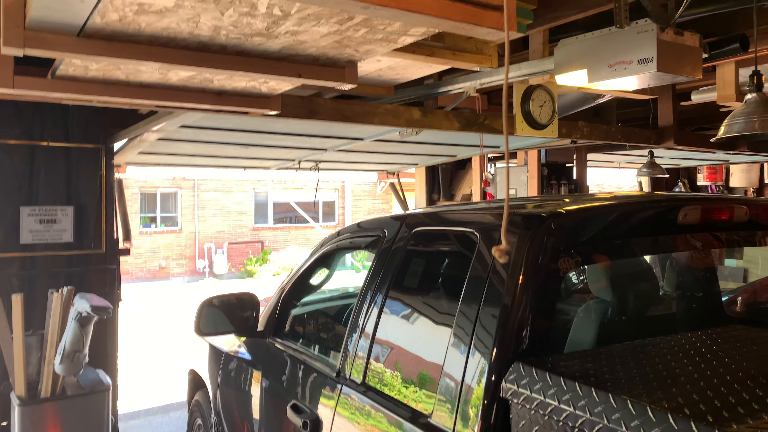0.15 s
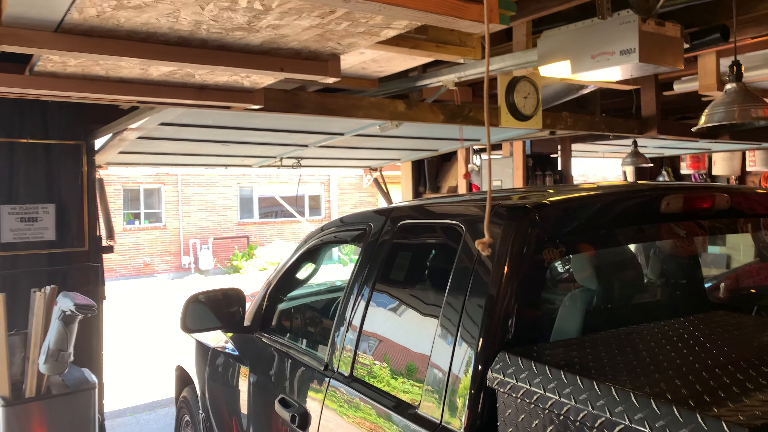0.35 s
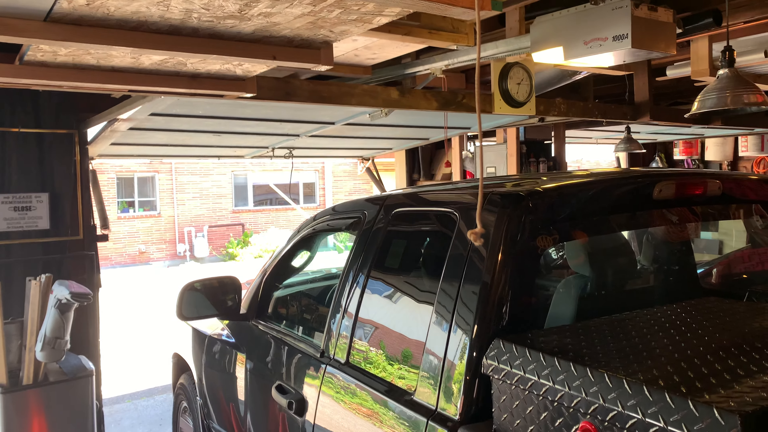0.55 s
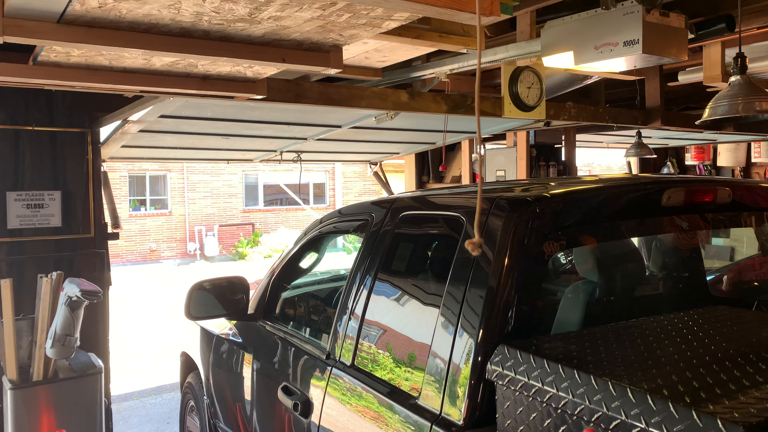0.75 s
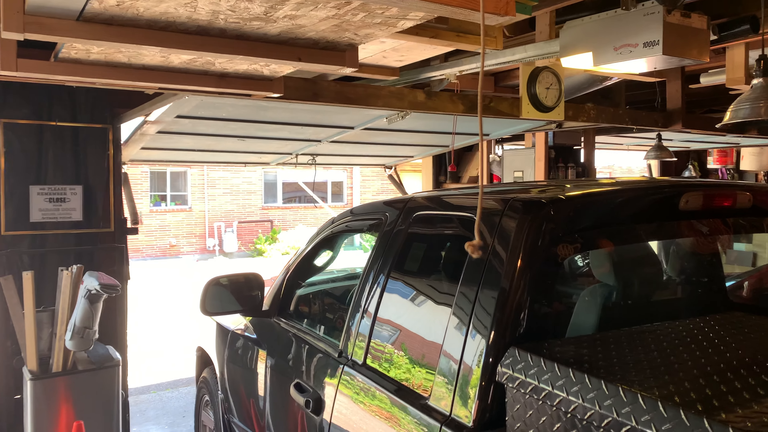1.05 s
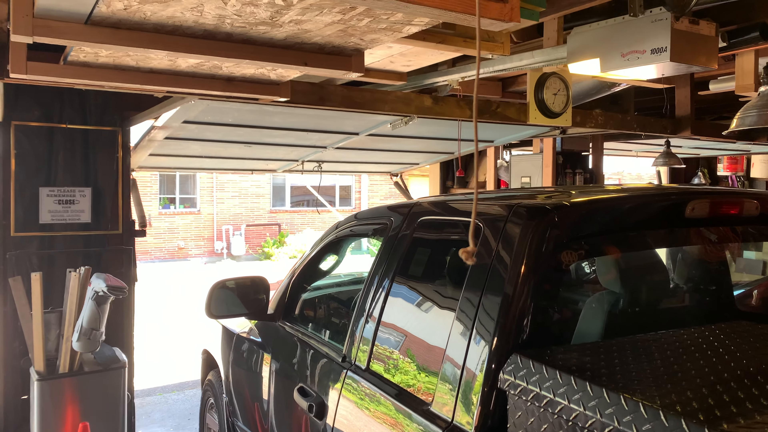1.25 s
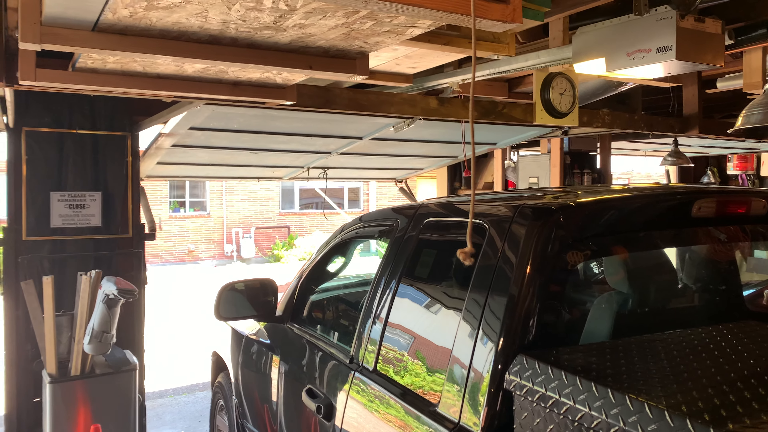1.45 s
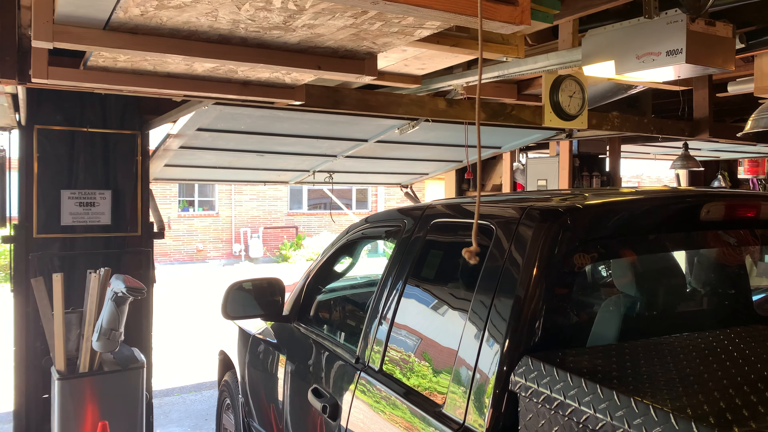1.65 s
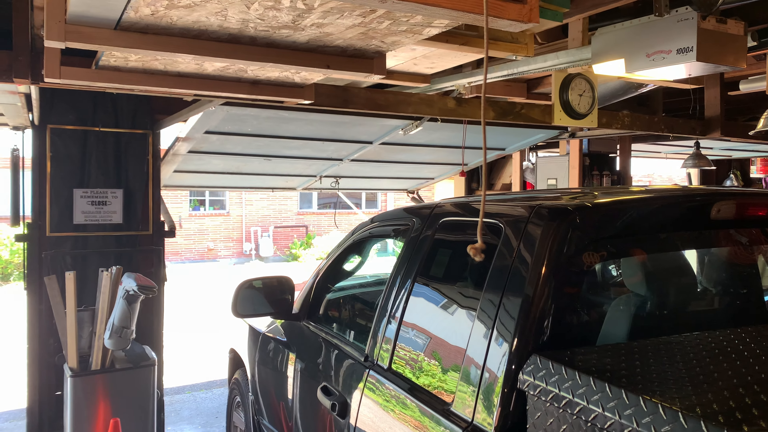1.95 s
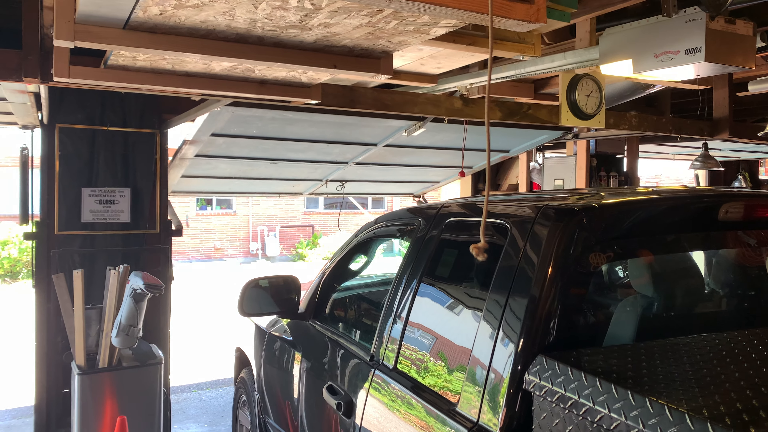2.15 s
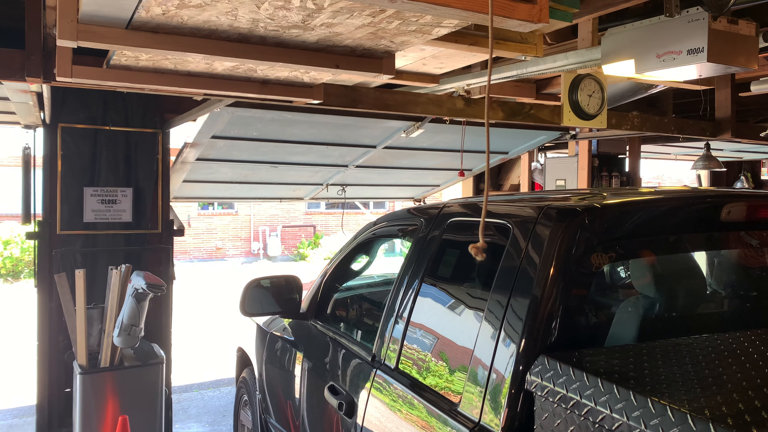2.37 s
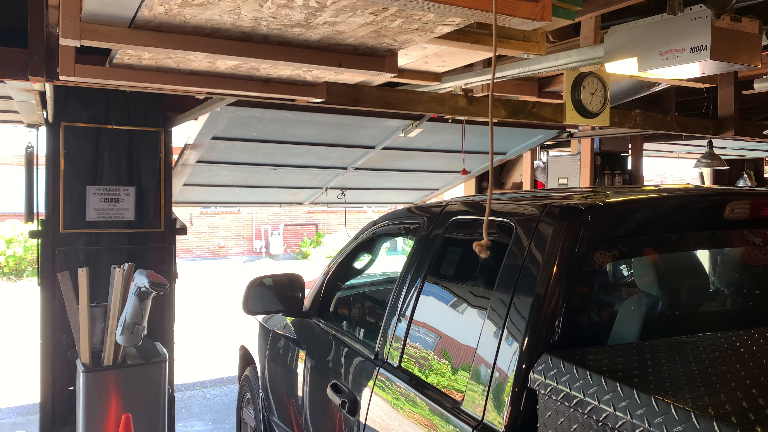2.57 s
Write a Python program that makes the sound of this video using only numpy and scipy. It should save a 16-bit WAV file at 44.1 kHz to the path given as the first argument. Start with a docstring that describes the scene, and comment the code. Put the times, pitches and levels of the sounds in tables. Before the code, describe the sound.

Garage door closing on a chain-drive opener, motor hum, ticking chain, opening clunk and rumbling rollers

```python
"""Chain-drive garage door closing

An opener lowers a sectional door in a cluttered wooden garage. The motor, sine tones at multiples
of twice the mains rate, hums; bursts of contacts tick as chain links seat on the sprocket.
The chain swishes along the rail, rollers rumble through resonant panels and squeak now and then,
loose panels rattle, and a panel joint clunks at the start with a decaying ring of steel."""
import sys
import numpy as np
from scipy import signal
from scipy.fft import rfft, irfft, next_fast_len
from scipy.io import wavfile

SR = 44100
rng = np.random.default_rng(int(sys.argv[2]) if len(sys.argv) > 2 else 0)


def wav_out(sig):
    """Save sig, one row per channel (or a flat mono array), as 16-bit PCM at SR to the path in sys.argv[1]."""
    wavfile.write(sys.argv[1], SR, np.round(np.clip(np.atleast_2d(sig).T, -1, 1) * 32767).astype(np.int16))


N = 119511
T = np.arange(N) / SR

# Motor hum: (multiple of MOTOR_HZ, level [dB], flutter share)
HUM_TONES = [(1, -34, 0.17), (2, -43, 0.24), (3, -51, 0.58)]
# Brief dips of the lowest hum tone: (time [s], depth [dB], half length to 1/e of depth [s])
HUM_DIPS = [(0.817, 7, 0.057), (1.222, 23, 0.011), (1.82, 8.5, 0.034), (2.03, 8, 0.02), (2.287, 20, 0.0094)]
MOTOR_HZ, TREMOR_HZ, TREMOR_SHARE = 119.65, 17.0, .14

# Links that catch hard on the sprocket: (time [s], level before TICK_OFFSET_DB [dB])
HARD_LINKS = [(0.191, -35), (0.2935, -31), (0.396, -32.5), (0.4534, -40), (.485, -32.5), (0.549, -35.5),
              (0.601, -32.5), (0.654, -37), (0.7572, -38), (0.8056, -33), (0.9153, -42), (1.011, -31.5),
              (1.059, -30.5), (1.113, -34), (1.163, -34), (1.3686, -31.5), (1.42, -33), (1.47, -33.5),
              (1.521, -37), (1.6247, -31.5), (1.8297, -39), (1.878, -36.5), (2.136, -31), (2.234, -31),
              (2.2892, -31.5), (2.3415, -34), (2.4594, -37), (2.548, -36.5), (2.598, -34.5), (2.643, -35),
              (2.7014, -28.5)]
# Crackle spectrum of the links: (frequency [Hz], relative density [dB per Hz])
TICK_SPECTRUM = [(3000, -10.5), (5000, -2.5), (6500, 2.5), (7800, 0), (9400, 3), (11000, -14.5), (12300, 2),
                 (13500, -4), (16000, -9)]
# Ring of the link plates: (frequency [Hz], width [Hz], level relative to the crackle [dB])
LINK_MODES = [(7770, 390, -3.5), (8650, 510, -8), (9430, 180, -11.5), (10070, 290, -10), (10670, 150, -12),
              (13000, 900, -14)]
LINKS_PER_S, FIRST_LINK_S, LINK_JITTER_S = 19.5145, 0.0365, .005
SOFT_LINK_DB, LINK_SPREAD_DB, LINK_COLOUR_DB = -41.5, 2.5, 4  # level before TICK_OFFSET_DB
TICK_OFFSET_DB, TICK_RISE_S, TICK_FALL_S, TICK_GRAINS_PER_S = -6, .007, .007, 9800
THUD_DB, THUD_DELAY_S, THUD_FALL_S = -40, 0.0034, 0.0072
JINGLE_DB, JINGLE_GRAINS_PER_S = -48, 2500

# Chain dragging on the rail: (frequency [Hz], relative density [dB per Hz])
SWISH_SPECTRUM = [(1500, 10), (2400, -3), (3300, 0), (4700, 4.5), (6000, 4), (7200, -1), (9000, -23),
                  (11000, -56), (13300, -24), (16000, -7.5)]
# Swish over time: (time [s], level before SWISH_OFFSET_DB [dB])
SWISH_LEVEL = [(0, -53), (.33, -47), (.39, -57), (.48, -51), (.56, -53.5), (.65, -46.5), (.7, -55.5),
               (.74, -45.5), (.82, -56), (.87, -56.5), (.92, -53), (1.26, -50.5), (1.32, -58), (1.42, -51),
               (1.54, -50.5), (1.64, -52), (1.86, -54), (1.93, -60), (2.03, -52), (2.15, -48.5), (2.2, -53),
               (2.25, -54.5), (2.47, -50), (2.52, -62), (2.57, -50), (2.71, -55)]
SWISH_OFFSET_DB, SWISH_GRAINS_PER_S, SWISH_WAVER_DB, SWISH_PAN_DB = 2, 3500, 1.3, 3

# Rollers on the tracks: (frequency [Hz], relative density [dB per Hz])
ROLLER_SPECTRUM = [(250, -26), (430, -4), (560, 1), (690, -5.5), (780, -3.5), (950, 0), (1100, -10),
                   (1200, -15), (1330, -6.5), (1550, -8), (1720, -23), (2200, -13), (3100, -27),
                   (5000, -59)]
# Rollers over time: (time [s], level before ROLLER_OFFSET_DB [dB])
ROLLER_LEVEL = [(0, -42), (.2, -41.5), (.42, -42.5), (.7, -42), (.87, -42.5), (.97, -42), (1.05, -43),
                (1.18, -43.5), (1.25, -42), (1.5, -43), (1.9, -43), (2.08, -42.5), (2.18, -42.5),
                (2.26, -42.5), (2.4, -43), (2.47, -42.5), (2.56, -42.5), (2.71, -43)]
ROLLER_OFFSET_DB, ROLLER_KNOCKS_PER_S, ROLLER_PAN_DB = -0.5, 700, -.7
ROLLER_PATCHY_DB, ROLLER_SWELL_DB = 1.66, .7
# Drive housing and door ringing under load: (frequency [Hz], width [Hz], level before swells [dB])
BODY_MODES = [(103.7, 4.3, -46.5), (155.6, 5.8, -53.5), (293.5, 11.7, -50), (366.3, 25, -50.5),
              (558.5, 23, -51.5), (750, 8.2, -55), (778, 24, -61), (949.4, 14, -52), (1114, 7, -56.5),
              (1285, 12.6, -55), (1482, 14, -59.5), (1925, 3.8, -64), (2450, 6.2, -90)]
JOLTS_PER_S, JOLT_SHARE = 130, 0.76
# Rumble of door and ceiling: (frequency [Hz], relative density [dB per Hz])
RUMBLE_SPECTRUM = [(22, -38), (32, -14), (46, -2.5), (60, -1), (85, 1.5), (130, -1.5), (170, -8),
                   (215, -2.5), (290, -5), (380, -8), (480, -18.5), (800, -53)]
RUMBLE_DB, LOW_PAN_DB = -38.5, 0.73

# Brief roller squeaks: (time [s], length [s], frequency [Hz], level before roughness [dB])
SQUEAKS = [(0.934, 0.13, 948, -43), (1.71, .08, 750, -45), (2.125, 0.083, 746, -40.5),
           (2.157, 0.062, 945, -39.5), (2.432, 0.091, 567, -39)]
SQUEAK_WAVER_HZ, SQUEAK_ROUGH_DB = 12, 3.5

# Loose panels bending round the track: (time [s], level [dB], rise [s], decay constant [s])
RATTLES = [(.62, -44.5, 0.025, 0.028), (.765, -43, 0.035, 0.03), (1.23, -43.5, 0.025, 0.016),
           (1.39, -44.5, 0.015, 0.021), (1.73, -58, 0.028, .04), (1.98, -47, 0.027, 0.033),
           (2.132, -41.5, 0.0085, 0.016), (2.448, -42.5, 0.021, 0.018), (2.61, -44, .012, 0.014)]
# Rattle colour: (frequency [Hz], relative density [dB per Hz])
RATTLE_SPECTRUM = [(400, -14), (800, -5), (1350, 7), (1750, -3), (2200, 2.5), (3000, -4), (5000, -8),
                   (9000, -19)]

# Panel joint knocks: (time [s], level before CRACK_SHARE and ring [dB], centre [Hz],
# rise [s], decay constant [s])
CLUNKS = [(.05, -39, 55, 0.023, .14), (.2, -34, 315, 0.0099, 0.099), (.0515, -37.5, 2190, 0.0012, 0.0045),
          (.065, -49, 2000, .002, 0.0054), (0.0975, -37, 2900, 0.0012, 0.024),
          (0.119, -33, 1900, 0.0018, 0.0069), (0.132, -30.5, 1670, 0.0032, .014),
          (0.176, -37, 1400, .002, 0.01), (0.198, -36.5, 2160, 0.0013, 0.0056),
          (.211, -38, 1990, .0015, 0.019), (0.2458, -25.5, 5040, 0.00059, 0.0044),
          (0.252, -39, 4470, 0.0039, 0.031), (0.256, -41, 1990, 0.0014, 0.041),
          (.33, -44, 2100, 0.0018, 0.01)]
# Ring of the joint's steel: (frequency [Hz], level relative to the blow [dB], t60 [s])
JOINT_MODES = [(568, -3, 0.26), (1160, -8, 0.41), (1240, -13, 0.23), (1492, 1.5, 0.26), (1570, -20, 0.093),
               (1890, -9.5, 0.33), (2143, -14, 0.12), (2322, -9.5, 0.22), (2460, -26, 0.2), (2780, -35, .2),
               (3210, -40, 0.28), (3466, -14, 0.31), (4160, -32, .15), (4820, -18, 0.19)]
# Blows that ring the joint: (time [s], level [dB], pitch ratio)
JOINT_BLOWS = [(.107, -32.5, 0.99), (.2, -45, 1.03), (0.2539, -39.5, 1.025)]
CLUNK_STEP_OCTAVES, JOINT_WIDTH_HZ, CRACK_SHARE = 0.44, 50, .6

# Diffuse sound in the garage: (frequency [Hz], side over mid [dB])
SIDE_SPECTRUM = [(60, -23), (160, -10), (270, -14), (450, -5.5), (740, -5), (1220, -2.5), (2010, -0.5),
                 (5500, -1.5)]
DRIVE_LAG_S, DRIVE_ROOM_DB, GARAGE_T60_S = .000212, -7.5, 0.12
CUTOFF_HZ = 15800


def from_db(db):
    """Decibels to gain."""
    return 10 ** (np.asarray(db) / 20)


def rms_one(x):
    """Scale to unit power."""
    return x / np.sqrt(np.mean(x ** 2) + 1e-20)


def curve(rows):
    """Control curve at every sample."""
    return np.interp(T, *np.transpose(rows))


def pan(x, db):
    """Raise the right ear and lower the left by db."""
    return x * from_db([[-db], [db]])


def colour(x, points):
    """Filter by gain points (Hz, dB), joined over log frequency."""
    hz, db = np.transpose(points)
    size = next_fast_len(N)
    f = np.maximum(np.arange(size // 2 + 1) * SR / size, 1)
    gain = from_db(np.interp(np.log(f), np.log(hz), db))
    return irfft(rfft(x, size) * gain, size)[..., :N]


def drift(rate_hz):
    """Low-passed noise of unit rms, computed every 40 samples."""
    r = np.exp(-80 * np.pi * rate_hz / SR)
    noise = rng.standard_normal(N // 40 + 2002)
    slow = signal.lfilter([1], [1, -2 * r, r * r], noise)[2000:]  # drop the filter's start-up
    return np.interp(np.arange(N) / 40, np.arange(len(slow)), rms_one(slow))


def resonate(x, hz, width_hz):
    """Two-pole resonance."""
    r = np.exp(-np.pi * width_hz / SR)
    return signal.lfilter([1, 0, -1], [1, -2 * r * np.cos(2 * np.pi * hz / SR), r * r], x)


def grains(per_s, spread_db):
    """Random tiny contacts of uneven size, at unit power."""
    sizes = from_db(spread_db * np.minimum(rng.exponential(1, N), 4))
    signs = rng.choice([-1, 1], N)
    return rms_one(sizes * signs * (rng.random(N) < per_s / SR))


def bursts(rows, rise_s, fall_s):
    """Envelope of contacts (time [s], level [dB]): linear rise, exponential decay, powers summed."""
    power = np.zeros(N)
    for s, db in rows:
        i = max(int(s * SR), 0)
        t = T[:len(power[i:i + SR // 2])]
        decay = np.exp(-np.maximum(t - rise_s, 0) / fall_s)
        power[i:i + len(t)] += (from_db(db) * np.minimum(t / rise_s, 1) * decay) ** 2
    return np.sqrt(power)


def motor():
    """Mains hum with a load tremor, flutter and brief dips of its lowest tone."""
    tremor = np.sin(2 * np.pi * TREMOR_HZ * T + 2.54 * drift(1.3))
    hum = 0
    for k, db, flutter in HUM_TONES:
        phase = 2 * np.pi * (k * MOTOR_HZ * T + rng.random())
        swell = 1 + TREMOR_SHARE * tremor + flutter * drift(48) * 0.63
        tone = swell * np.sin(phase) + flutter * 0.12 * drift(7.0) * np.cos(phase)
        dip_db = 0
        if k == 1:
            dip_db = sum(depth * np.exp(-((T - s) / half) ** 2) for s, depth, half in HUM_DIPS)
        hum = hum + from_db(db - dip_db) * rms_one(tone)
    return pan(hum, LOW_PAN_DB)


def link_metal(per_s):
    """Dense link contacts: bright crackle plus plate resonances whose balance drifts."""
    contacts = grains(per_s, spread_db=-0.5)
    rings = 0
    for hz, width_hz, db in LINK_MODES:
        ring = resonate(contacts, hz, width_hz) * from_db(LINK_COLOUR_DB * drift(19))
        rings = rings + from_db(db) * rms_one(ring)
    return rms_one(rms_one(colour(contacts, TICK_SPECTRUM)) + rings)


def chain():
    """Links tick on the sprocket and jolt the housing; loose links jingle, the slack run drags."""
    times = np.arange(FIRST_LINK_S, T[-1], 1 / LINKS_PER_S)
    hard_s = np.array(HARD_LINKS)[:, 0]
    soft = []
    for s, (z, late) in zip(times, rng.standard_normal((len(times), 2))):
        if np.abs(hard_s - s).min() > .5 / LINKS_PER_S:  # no hard link in this slot
            soft.append((s + LINK_JITTER_S * late, SOFT_LINK_DB + LINK_SPREAD_DB * z))
    tick_level = bursts(list(HARD_LINKS) + soft, TICK_RISE_S, TICK_FALL_S)
    ticks = tick_level * from_db(TICK_OFFSET_DB) * link_metal(TICK_GRAINS_PER_S)

    thud_level = bursts([(s + THUD_DELAY_S, THUD_DB) for s in times], TICK_RISE_S, THUD_FALL_S)
    thud_noise = colour(room_noise(), [(450, -71), (800, 12), (1400, 0), (2200, -17.5)])
    thuds = thud_level * rms_one(thud_noise)

    drag_db = curve(SWISH_LEVEL)
    jingle_db = JINGLE_DB + 0.47 * (drag_db - drag_db.mean()) + 0.95 * drift(17)
    jingle = from_db(jingle_db) * link_metal(JINGLE_GRAINS_PER_S)

    scraping = np.array([grains(SWISH_GRAINS_PER_S, spread_db=-1.5) for ear in range(2)])
    swish_db = drag_db + SWISH_OFFSET_DB + SWISH_WAVER_DB * drift(37)
    swish = from_db(swish_db) * rms_one(colour(scraping, SWISH_SPECTRUM))
    return from_drive(ticks + jingle) + pan(swish, SWISH_PAN_DB) + thuds


def patchy(x, depth_db):
    """Five frequency bands swell independently."""
    size = next_fast_len(N)
    f = np.arange(size // 2 + 1) * SR / size
    spectrum = rfft(x, size)
    edges_hz = [0, 650, 880, 1200, 1700, SR]
    out = 0
    for lo, hi in zip(edges_hz, edges_hz[1:]):
        band = irfft(spectrum * ((f >= lo) & (f < hi)), size)[..., :N]
        out = out + band * from_db(depth_db * drift(17))
    return rms_one(out)


def door():
    """Rollers knock along the tracks; noise and jolts excite body resonances over a steady rumble."""
    level_db = curve(ROLLER_LEVEL)
    mid = grains(ROLLER_KNOCKS_PER_S, spread_db=0.5)
    side = grains(ROLLER_KNOCKS_PER_S, spread_db=3.5)
    knocks = diffuse(mid, side) + room_noise()
    roller_db = level_db + ROLLER_OFFSET_DB + ROLLER_SWELL_DB * drift(12)
    rollers = from_db(roller_db) * patchy(colour(knocks, ROLLER_SPECTRUM), ROLLER_PATCHY_DB)

    jolts = diffuse(grains(JOLTS_PER_S, spread_db=0.0), grains(JOLTS_PER_S, spread_db=-1.0))
    shake = room_noise() + JOLT_SHARE * jolts
    body = sum(from_db(db) * rms_one(resonate(shake, hz, width)) for hz, width, db in BODY_MODES)
    body = body * from_db(3.1 * (level_db - level_db.mean()))  # swells more than the rollers

    rumble = from_db(RUMBLE_DB) * rms_one(colour(room_noise(), RUMBLE_SPECTRUM))
    return pan(rollers, ROLLER_PAN_DB) + body + pan(rumble, LOW_PAN_DB)


def squeaks():
    """A dry roller sticks and slips: a wavering, rough sine near a door resonance."""
    out = np.zeros((2, N))
    for s, length_s, hz, db in SQUEAKS:
        swell = np.sin(np.pi * np.clip((T - s) / length_s, 0, 1))
        phase = 2 * np.pi * np.cumsum(hz + SQUEAK_WAVER_HZ * drift(25.7)) / SR
        ear_phase = .5 * rng.standard_normal((2, 1))
        out += from_db(db + SQUEAK_ROUGH_DB * drift(60)) * swell * np.sin(phase + ear_phase)
    return out


def clatter(per_s):
    """Rapid metal contacts plus noise, scattered by the garage."""
    contacts = diffuse(grains(per_s, spread_db=1.0), grains(per_s, spread_db=3.0))
    return contacts + 1.03 * room_noise()


def panels():
    """Loose panels rattle in short swells of filtered contacts."""
    swells = sum(bursts([(s, db)], rise, fall) for s, db, rise, fall in RATTLES)
    return swells * rms_one(colour(clatter(1100), RATTLE_SPECTRUM))


def joint():
    """A panel joint shifts: dry cracks with short steel resonances, plus blows with longer rings."""
    knocks = np.zeros((2, N))
    for s, db, hz, rise_s, fall_s in CLUNKS:
        band = [(hz * 2 ** (k * CLUNK_STEP_OCTAVES), -3.5 * k * k) for k in range(-4, 5)]
        knocks += bursts([(s, db)], rise_s, fall_s) * rms_one(colour(clatter(2000), band))
    ring = sum(resonate(knocks + 1e-18, hz, JOINT_WIDTH_HZ) for hz, _, _ in JOINT_MODES)
    out = CRACK_SHARE * knocks + np.pi * JOINT_WIDTH_HZ / SR * ring
    for s, db, pitch in JOINT_BLOWS:
        t = np.maximum(T - s, 0)
        attack = np.minimum(t / 0.0054, 1)
        for hz, mode_db, t60_s in JOINT_MODES:
            phase = 2 * np.pi * rng.random() + 0.75 * rng.standard_normal((2, 1))
            level = from_db(db + mode_db - 60 * t / t60_s) * attack
            out += level * np.sin(2 * np.pi * hz * pitch * t + phase)
    return out


def diffuse(mid, side):
    """Sound from all around: nearly alike at both ears in the bass, much less so in the treble."""
    return mid + colour(side, SIDE_SPECTRUM) * np.array([[1], [-1]])


def room_noise():
    """White noise scattered by the garage."""
    return diffuse(*rng.standard_normal((2, N)))


def from_drive(x):
    """The drive hangs to the right: the left ear lags, and the walls add short noise tails."""
    t = T[:SR // 4]
    tails = rng.standard_normal((2, len(t))) * from_db(-60 * t / GARAGE_T60_S) * (t > .002)
    tails /= np.sqrt(np.sum(tails ** 2, axis=1, keepdims=True))
    left = signal.lfilter(np.sinc(np.arange(32) - DRIVE_LAG_S * SR), [1], x)  # fractional delay
    room = signal.fftconvolve(x[None], tails, axes=1)[:, :N]
    return np.array([left, x]) + from_db(DRIVE_ROOM_DB) * room


def scene():
    """Motor, chain, door, squeaks, rattles and clunks together."""
    return motor() + chain() + door() + squeaks() + panels() + joint()


def record(dry):
    """Steep elliptic low-pass at CUTOFF_HZ."""
    return signal.sosfilt(signal.ellip(10, .2, 80, CUTOFF_HZ, fs=SR, output="sos"), dry)


dry = scene()
out = record(dry)
wav_out(out)
```